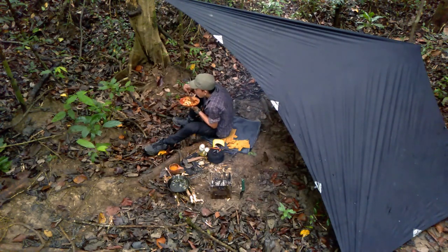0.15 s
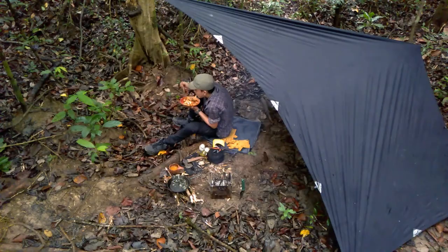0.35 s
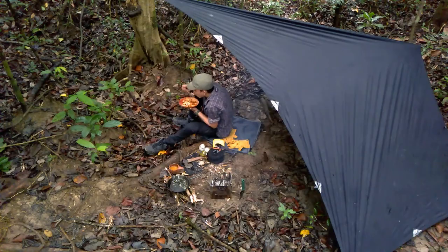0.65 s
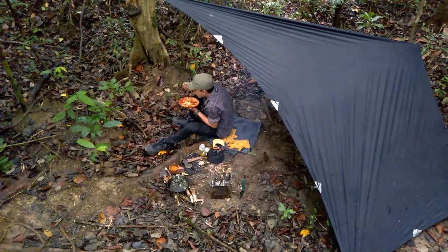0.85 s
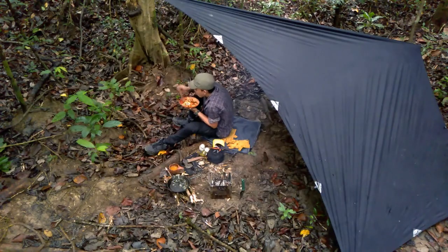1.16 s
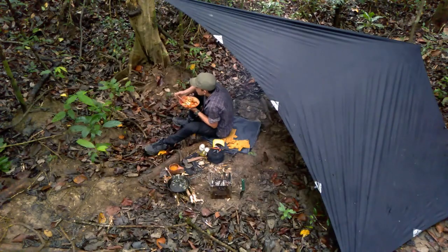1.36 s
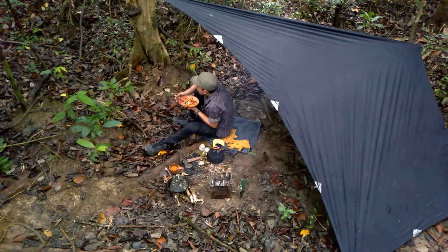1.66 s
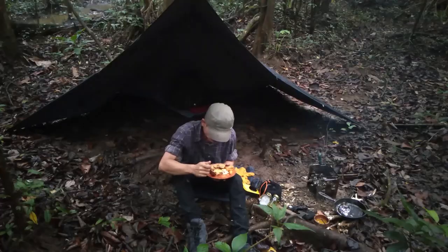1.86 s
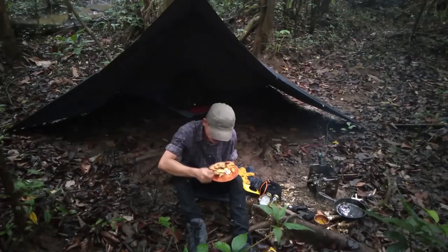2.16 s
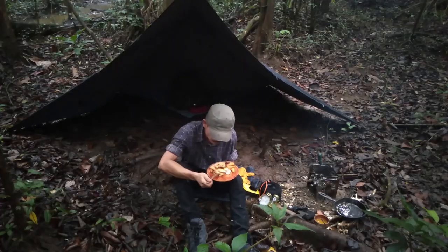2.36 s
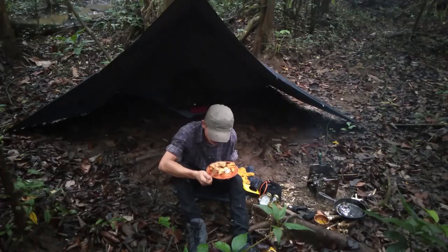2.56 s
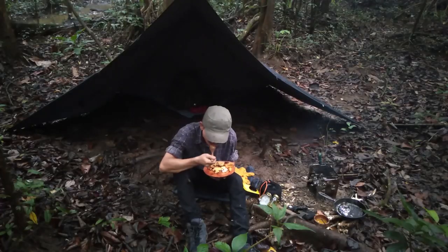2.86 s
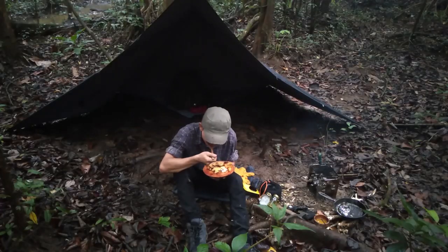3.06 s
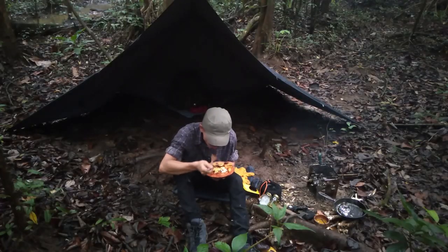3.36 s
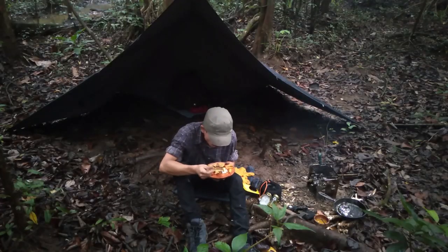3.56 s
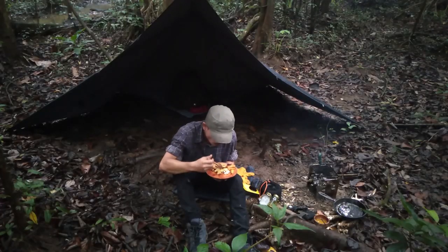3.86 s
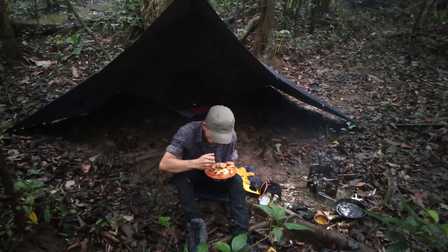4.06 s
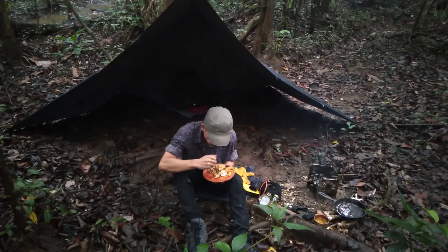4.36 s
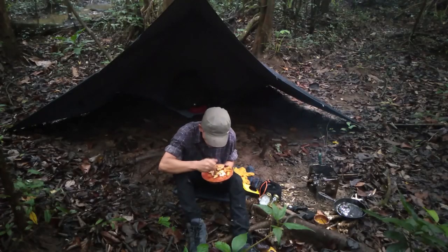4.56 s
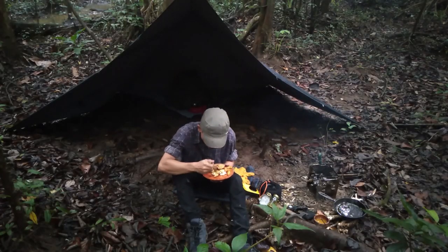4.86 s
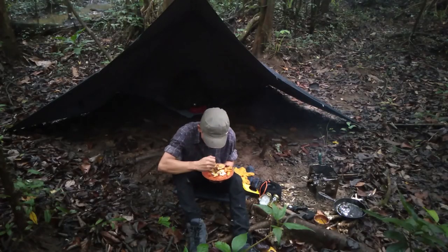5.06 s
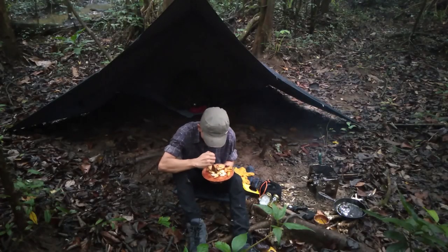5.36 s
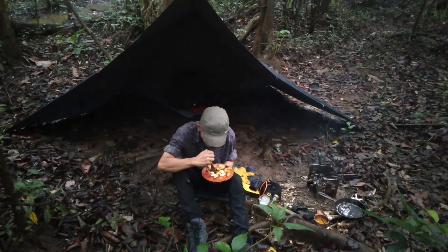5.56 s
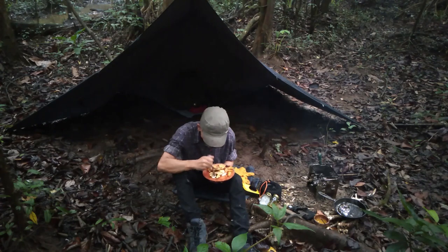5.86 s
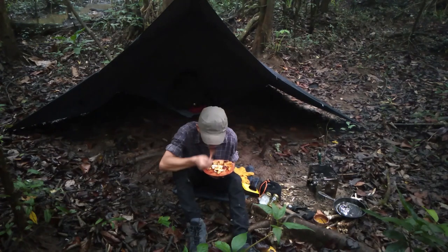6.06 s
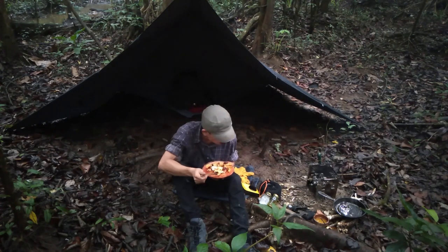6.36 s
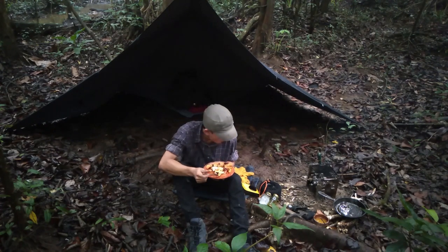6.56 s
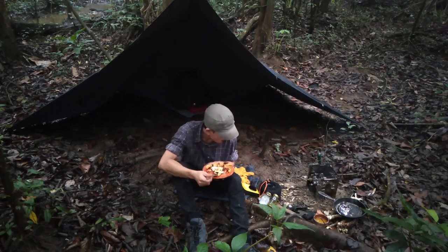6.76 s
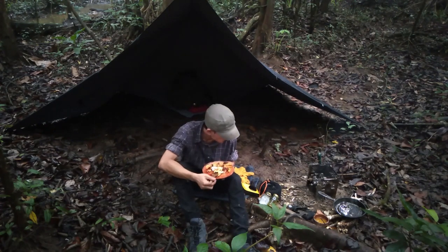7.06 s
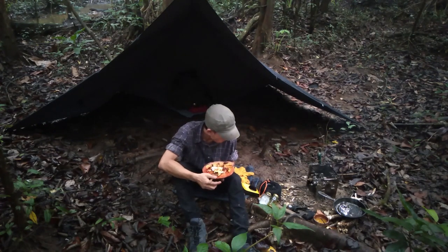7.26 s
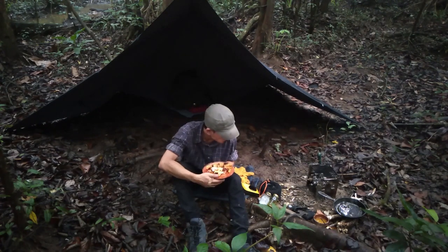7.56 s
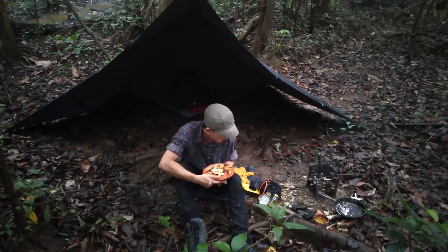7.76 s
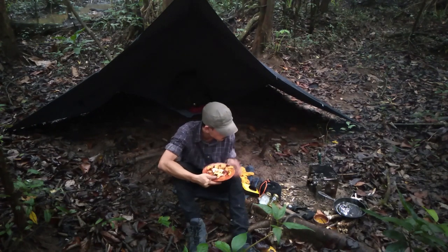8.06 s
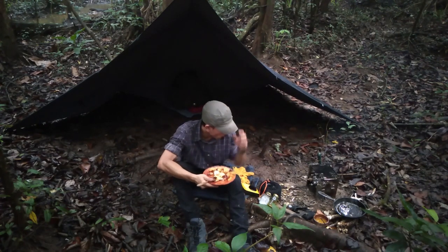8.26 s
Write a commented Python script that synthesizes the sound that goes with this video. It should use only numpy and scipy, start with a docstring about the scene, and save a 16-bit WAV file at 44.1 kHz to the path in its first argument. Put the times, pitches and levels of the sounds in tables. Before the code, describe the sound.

In a humid rainforest, cicadas hold one high ringing note that swells and beats, with crickets trilling, katydids rasping in short zips and a distant insect swarm hissing. A far bird yelps hoarsely, a small nearer one chips, and drops tap leaves. Near six seconds the chorus abruptly thins and a bird gives seven quick round hoots. Wide outdoor pickup, mono, with soft echoes from trunks.

```python
"""Rainforest camp in mono: cicadas ring on one note, crickets trill before a distant swarm, katydids rasp on
top. Insects are beating tones and shaped noise, birds short gliding tones; an insect pulses very high. A far
bird yelps, another hoots, a nearer one chips; drops tap leaves, low thumps and drones lie in still air. Tree
trunks scatter the calls as fading echoes. Much of the full chorus plays again after four seconds; near six
seconds the scene changes to a thinner chorus."""
import sys
import numpy as np
from scipy import signal
from scipy.fft import rfft, irfft, next_fast_len
from scipy.io import wavfile
from scipy.ndimage import uniform_filter1d, map_coordinates

SR = 44100
rng = np.random.default_rng(int(sys.argv[2]) if len(sys.argv) > 2 else 0)


def generate_wav(signal):
    """Clip the signal to [-1, 1] and save it as 16-bit WAV at the path in sys.argv[1]."""
    frames = np.transpose(np.atleast_2d(signal))
    scaled = np.clip(frames, -1, 1) * 32767
    pcm = np.round(scaled).astype(np.int16)
    wavfile.write(sys.argv[1], SR, pcm)


N = 370871
T = np.arange(N) / SR
END_S = N / SR
THIN_S, PHRASE_S = 5.865, 4.037
HIGH, MIDDLE, LOW = 5674, 5598, 5534  # wing tones of the near crickets, Hz


def undb(db):
    """Decibels to gain."""
    return 10 ** (np.asarray(db) / 20)


def level(x, db):
    """Scale a sound to an rms level."""
    return x * undb(db) / np.sqrt(np.mean(x ** 2))


def curve(rows, t_s=T):
    """Rows (time_s, value) joined by straight lines."""
    return np.interp(t_s, *np.transpose(rows))


def hiss(colour):
    """Noise of unit rms with a spectrum of (freq_hz, density_db) points."""
    size = next_fast_len(N, True)
    freq_hz, density_db = np.transpose(colour)
    bins_hz = np.arange(1, size // 2 + 2) * SR / size
    gain = undb(np.interp(np.log(bins_hz), np.log(freq_hz), density_db))
    spectrum = rfft(rng.standard_normal(size)) * gain
    return level(irfft(spectrum, size)[:N], 0)


def walk(rate_hz):
    """Smooth random curve through rate_hz unit-spread values a second."""
    points = rng.standard_normal(int(N / SR * rate_hz) + 4)
    return map_coordinates(points, [T * rate_hz + 1], order=3, mode="nearest")


def gate(start_s, end_s):
    """On between two times, with soft edges."""
    return np.clip(np.minimum(T - start_s, end_s - T) / 0.017 + 1.1, 0, 1)


def swell(peak_s, attack_s, release_s):
    """Rounded rise to 1 at peak_s, then an exponential fall."""
    rise = (np.minimum(T - peak_s, 0) / attack_s) ** 2
    fall = np.maximum(T - peak_s, 0) / release_s
    return np.exp(-rise - fall)


def twice(x):
    """One phrase followed by its repeat."""
    return x + np.pad(x, (int(PHRASE_S * SR), 0))[:N]


def forest(x, t60_s, wet_db):
    """Direct sound plus a fading spray of echoes from trunks."""
    t = T[:SR]
    fade = undb(-60 * t / t60_s) * (1 - np.exp(-t / 0.0028))
    echoes = rng.standard_normal(SR) * fade
    echoes /= np.linalg.norm(echoes)
    return x + undb(wet_db) * signal.fftconvolve(x, echoes)[:len(x)]


def add(out, start_s, x, level_db, span_s):
    """Mix in a short sound whose loudest span_s has the given rms level."""
    start = max(int(start_s * SR), 0)
    loudest = np.sqrt(uniform_filter1d(x ** 2, int(span_s * SR)).max())
    out[start:start + len(x)] += (x * undb(level_db) / loudest)[:N - start]


def whistle(pitch_hz, length_s, rough=0):
    """A bird note swells and fades; pitch follows progress 0-1, shaken by rough if hoarse."""
    progress = np.minimum(T[:SR] / length_s, 1)
    shake = level(uniform_filter1d(rng.standard_normal(SR), size=60), 0)
    phase = 2 * np.pi * np.cumsum(pitch_hz(progress) * (1 + rough * shake)) / SR
    return np.sin(np.pi * progress) * np.sin(phase)


def blurred_tones(rows):
    """Many echo paths give far tones a random strength and phase."""
    out = np.zeros(N)
    for start_s, end_s, pitch_hz, width_hz, level_db in rows:
        phase = 2 * np.pi * np.cumsum(pitch_hz + .2 * width_hz * walk(40)) / SR
        on = gate(start_s, end_s)
        tone = (walk(width_hz) * np.cos(phase) + walk(width_hz) * np.sin(phase)) * on
        out += level(tone, level_db) * np.sqrt(on.mean())  # level holds while on
    return out


def still_air(level_db=-63.5, unsteady_db=0.7):
    """Quiet forest air: shaped noise of slightly wandering level."""
    # relative spectrum: freq_hz, density_db
    air_colour = [(20, -1.5), (48, -1.5), (70, -7), (90, -5), (130, -9), (300, -20.5), (600, -20),
                  (1400, -23.5), (1900, -16.5), (2400, -12), (4000, -28.5)]
    return hiss(air_colour) * undb(level_db + unsteady_db * walk(3.4))


def drones():
    """Faint low drones far off, as blurred tones."""
    # start_s, end_s, pitch_hz, width_hz, level_db
    hums = [(2.8, 5.3, 88, 10, -76), (7.45, END_S, 54, 3, -67.5)]
    return blurred_tones(hums)


def thumps(attack_s=0.021, release_s=0.097):
    """Dull, soft thumps: low noise under short swells."""
    # peak_s, level_db
    hits = [(5.9, -66.5), (6.13, -67)]
    # relative spectrum: freq_hz, density_db
    thump_colour = [(20, -3), (60, 0), (130, -15), (400, -14), (900, -24), (3000, -50)]
    envelope = sum(undb(level_db) * swell(peak_s, attack_s, release_s) for peak_s, level_db in hits)
    return hiss(thump_colour) * envelope


def drops(burst_s=0.0021):
    """A drop knocks a limp leaf: a brief noise burst in a wide band around its resonance."""
    # taps in one phrase: start_s, resonance_hz, level_db
    taps = [(.809, 695, -53.5), (.852, 1110, -50)]
    out = np.zeros(N)
    t = T[:SR // 4]
    for start_s, resonance_hz, level_db in taps:
        band_hz = [resonance_hz * 0.38, resonance_hz * 1.4]
        leaf = signal.butter(2, band_hz, "band", fs=SR, output="sos")
        knock = signal.sosfilt(leaf, rng.standard_normal(len(t)) * np.exp(-t / burst_s))
        add(out, start_s, forest(knock, t60_s=0.36, wet_db=-11), level_db, span_s=0.0054)
    return out


def far_crickets():
    """Far trills blurred by the trees."""
    # start_s, end_s, pitch_hz, width_hz, level_db
    far_tones = [(0, THIN_S, 5375, 50, -63.5), (0, THIN_S, 5550, 93, -57), (THIN_S, END_S, 5590, 35, -54),
                 (THIN_S, END_S, 5545, 60, -58.5), (THIN_S, END_S, 6735, 80, -51),
                 (6.4, END_S, 6980, 25, -58), (0, THIN_S, 9900, 50, -79), (0, END_S, 9100, 50, -80),
                 (0, END_S, 13580, 140, -60.5)]
    return blurred_tones(far_tones)


def swarm(thin, full_db=-42.5, thin_db=-45, shimmer_db=0.7):
    """Countless distant insects merge into shimmering bands of noise."""
    # relative spectrum of the full swarm: freq_hz, density_db
    full_colour = [(2300, -31.5), (2650, -30), (2950, -11), (3500, -17.5), (3900, -25.5), (5200, -23),
                   (5900, -15), (6430, 0.5), (6830, 1), (7050, -12), (7600, -22.5), (12200, -23),
                   (12850, -13), (13600, -12.5), (14200, -20.5)]
    # relative spectrum of the thin swarm: freq_hz, density_db
    thin_colour = [(2300, -26), (3200, -13), (3900, -33.5), (5150, -22.5), (5900, -11), (6500, 2),
                   (6800, 4.5), (7080, -2), (7300, -18), (7900, -18.5), (8300, -13.5), (8800, -25.5),
                   (12200, -21.5), (13500, -10), (14300, -31)]
    full = hiss(full_colour) * undb(full_db)
    sparse = hiss(thin_colour) * undb(thin_db)
    return (full * (1 - thin) + sparse * thin) * undb(shimmer_db * walk(60))


def pulser(pitch_hz=13300, width_hz=600, level_db=-61, rate_hz=16.6, unsteady=0.039):
    """An insect sends a thin, very high hiss in quick, nearly even pulses."""
    beat = 2 * np.pi * np.cumsum(rate_hz * (1 + unsteady * walk(3))) / SR
    tone = blurred_tones([(0, END_S, pitch_hz, width_hz, 0)])
    return level(tone * (1 + np.cos(beat)), level_db)


def yelper(gap_s=.201, first_wait_s=.035, settle_notes=2.5, rise=0.309, length_s=.06, under_db=-17):
    """Far hoarse rising yelps with a faint lower octave; each run settles in pitch and level."""
    # start_s, notes, first_hz, last_hz, first_db, last_db
    runs = [(.82, 11, 2110, 1700, -53.5, -62), (4.86, 5, 2113, 1700, -55, -60.5),
            (7.36, 5, 2180, 2150, -57, -57.5)]
    out = np.zeros(N)
    for start_s, notes, first_hz, last_hz, first_db, last_db in runs:
        for k in range(round(notes)):
            effort = np.exp(-(k / settle_notes) ** 2)
            mid_hz = last_hz + (first_hz - last_hz) * effort
            level_db = last_db + (first_db - last_db) * effort
            note_s = start_s + k * gap_s + min(k, 1) * first_wait_s  # the first gap is longer
            pitch = lambda u: mid_hz * (1 + rise * (u - .5))
            note = whistle(pitch, length_s, rough=0.099)
            under = whistle(lambda u: pitch(u) / 2, length_s, rough=.14)
            call = forest(note + undb(under_db) * under, t60_s=1.65, wet_db=7.5)
            add(out, note_s - .01, call, level_db, span_s=0.0042)
    return out


def hooter(start_s=5.823, gap_s=.2125, base_hz=1743, level_db=-47.3, count=7, arch=0.089, length_s=0.052,
           hoarse_db=-11.5, hoarse_hz=1950, under_db=-25, scatter=0.0086):
    """Round, even hoots arch in pitch, with a hoarse edge and a faint lower octave."""
    out = np.zeros(N)
    for k in range(count):
        note_s = start_s + k * gap_s
        note_hz = base_hz * (1 + scatter * rng.standard_normal())
        pitch = lambda u: note_hz * (1 + arch * (np.sin(np.pi * u) - .8))
        note = whistle(pitch, length_s, rough=0.024)
        edge = whistle(lambda u: hoarse_hz, length_s, rough=0.107)
        under = whistle(lambda u: pitch(u) / 2, length_s, rough=0.047)
        add(out, note_s, forest(note, t60_s=1.2, wet_db=-2), level_db, span_s=0.0099)
        add(out, note_s - .01, forest(edge, t60_s=1.0, wet_db=8), level_db + hoarse_db, span_s=0.033)
        add(out, note_s, forest(under, t60_s=1.3, wet_db=3), level_db + under_db, span_s=0.018)
    return out


def chipper():
    """A small bird nearby: quick chips, each a falling glide that flattens out."""
    # start_s, high_hz, low_hz, length_s, level_db
    chips = [(1.62, 6500, 3940, 0.017, -59), (2.797, 7300, 7070, 0.055, -51),
             (3.65, 7250, 7150, 0.087, -48), (6.94, 7900, 3420, 0.041, -53.5),
             (7.235, 7900, 3390, .036, -51), (7.749, 7696, 7200, .03, -55)]
    out = np.zeros(N)
    for start_s, high_hz, low_hz, length_s, level_db in chips:
        note = whistle(lambda u: low_hz + (high_hz - low_hz) * (1 - u) ** 1.5, length_s, rough=0.0061)
        add(out, start_s, forest(note, t60_s=0.54, wet_db=3.5), level_db, span_s=0.011)
    return out


def katydids(thin, attack_s=.035, release_s=.06, buzz_db=-56.5, buzz_edge_s=.12, far_db=-60,
             grain_db=1.5, gain_db=1.5):
    """File teeth scrape unevenly: zips and long buzzes over a far, constant rasp; gain_db lifts all."""
    # zips in one phrase, about two a second: peak_s, level_db (before gain_db)
    zip_rows = [(.01, -52), (.49, -52), (.91, -48), (1.46, -47), (1.94, -48), (2.45, -48), (2.93, -50.5),
                (3.36, -54), (3.56, -53)]
    # a second katydid's buzzes in one phrase: start_s, end_s
    buzz_rows = [(0, 1.07), (1.97, 3.1), (3.35, PHRASE_S)]
    # relative spectrum: freq_hz, density_db
    rasp_colour = [(10500, -57), (13400, -13), (13900, -6), (15700, -5), (16500, -27)]
    zips = sum((undb(level_db) * swell(peak_s, attack_s, release_s)) ** 2 for peak_s, level_db in zip_rows)
    buzzing = sum(gate(start_s, end_s) for start_s, end_s in buzz_rows)
    buzzing = uniform_filter1d(buzzing, int(buzz_edge_s * SR))
    near_power = twice(zips + undb(buzz_db) ** 2 * buzzing) * (1 - thin)
    power = near_power + undb(far_db) ** 2
    scrape = level(hiss(rasp_colour) * undb(grain_db * walk(200)), gain_db)
    return scrape * np.sqrt(power)


def crickets(waver_hz=9, flicker_db=0.7):
    """Wing tones throb as the wings open and close; neighbours beat into a rattle."""
    # trills in one phrase: start_s, end_s, pitch_hz, level_db, throb_hz, throb_depth (0-1)
    trills = [(0, 1.15, HIGH, -51.5, 9, 0.42), (1.12, 3.2, HIGH, -53.5, 11, 0.13),
              (3, PHRASE_S, HIGH, -51, 9.8, 0), (0.3, 1.05, MIDDLE, -49.5, 10.93, 0.8),
              (1.05, 2.4, MIDDLE, -58, 9.9, 0.4), (2.5, 3.94, MIDDLE, -50.5, 10.3, 0.15),
              (0, PHRASE_S, LOW, -60.5, 9.8, 0.6)]
    out = np.zeros(N)
    for start_s, end_s, pitch_hz, level_db, throb_hz, depth in trills:
        tone = np.sin(2 * np.pi * np.cumsum(pitch_hz + waver_hz * walk(50)) / SR)
        throb = 1 - depth * np.cos(2 * np.pi * throb_hz * (T - start_s))
        flicker = undb(flicker_db * walk(35))
        out += level(tone * throb * flicker, level_db) * gate(start_s, end_s)
    return forest(out, t60_s=0.64, wet_db=-21)


def cicadas(thin, full_hz=618, thin_hz=620, wander_hz=1.5, flutter_hz=2.8, drift_hz=0.601, gain_db=0.2):
    """Tymbals click at almost one rate; bodies ring on the fifth multiple, beating some 25 times a second."""
    # singers: offset_hz from the common tymbal rate, relative level_db
    singers = [(-5.5, -7), (0, 1), (0.99, -7), (4.5, -7.5)]
    # body resonance: multiple, relative full_db, relative thin_db
    body = [(4, -24, -17.5), (5, 0, 1.5), (6, -23, -26), (7, -21, -26.5), (8, -31.5, -50), (12, -29.5, -39),
            (13, -34.5, -44)]
    # joint effort over one full phrase: time_s, level_db (before gain_db)
    phrase_effort = [(0.02, -40.5), (0.11, -38.5), (0.22, -44.0), (0.35, -38), (0.46, -43.0), (0.65, -35.5),
                     (0.99, -44), (1.22, -36), (1.48, -43.5), (1.73, -38.5), (1.88, -45), (2.07, -36),
                     (2.18, -41.5), (2.29, -36), (2.46, -42.5), (2.7, -35.5), (2.88, -39.5), (3.1, -38.0),
                     (3.5, -42), (3.81, -37), (4.0, -43.5)]
    # joint effort in the thin chorus: time_s, level_db (before gain_db)
    thin_effort = [(5.9, -45), (6.26, -45.5), (6.43, -40), (6.65, -46), (7.3, -44.5), (7.58, -47),
                   (7.78, -43.0), (8.0, -49.5), (8.15, -43.5), (8.39, -45.5)]
    rate_hz = full_hz + (thin_hz - full_hz) * thin + drift_hz * walk(5)
    phases = []
    for offset_hz, _ in singers:
        singer_hz = rate_hz + offset_hz + wander_hz * walk(12) + flutter_hz * walk(100)
        phases.append(2 * np.pi * np.cumsum(singer_hz) / SR)
    song = np.zeros(N)
    for multiple, full_db, thin_db in body:
        partial = sum(undb(db) * np.sin(multiple * phase) for phase, (_, db) in zip(phases, singers))
        partial = forest(partial, t60_s=0.36, wet_db=-3)
        # divide out slow swells, keep quick beats
        slow = np.sqrt(uniform_filter1d(partial ** 2, int(.15 * SR)) + 1e-9)
        song += level(partial / slow, 0) * undb(full_db + (thin_db - full_db) * thin)
    effort_db = curve(phrase_effort, T % PHRASE_S) * (1 - thin) + curve(thin_effort) * thin
    return song * undb(gain_db + effort_db)


def scene():
    """All callers over quiet air, alike in both channels; at THIN_S near crickets stop and hoots enter."""
    thin = np.clip((T - THIN_S) / .01, 0, 1)  # 0 full, 1 thin
    background = still_air() + drones() + thumps() + twice(drops())
    far = far_crickets() + swarm(thin)
    birds = yelper() + hooter() * thin + chipper()
    near = pulser() + katydids(thin) + twice(crickets()) * (1 - thin) + cicadas(thin)
    mono = background + far + birds + near
    return np.array([mono, mono])


def record(dry, top_hz=15740):
    """A steep elliptic low-pass cuts the very top."""
    return signal.sosfilt(signal.ellip(12, .1, 80, top_hz, fs=SR, output="sos"), dry)


dry = scene()
out = record(dry)
generate_wav(out)
```